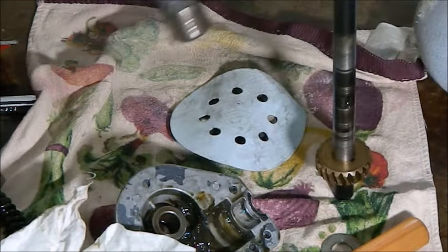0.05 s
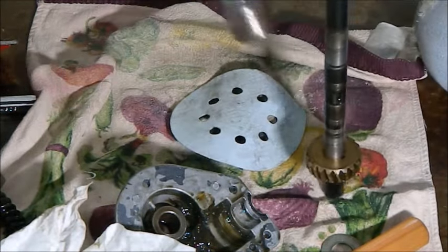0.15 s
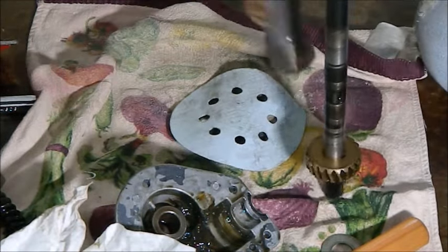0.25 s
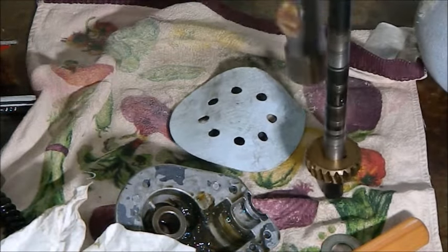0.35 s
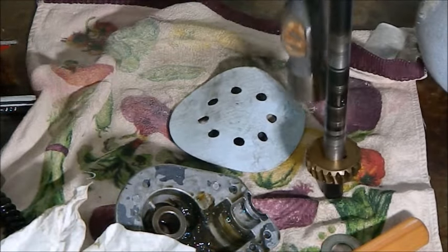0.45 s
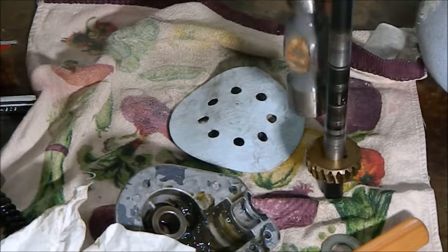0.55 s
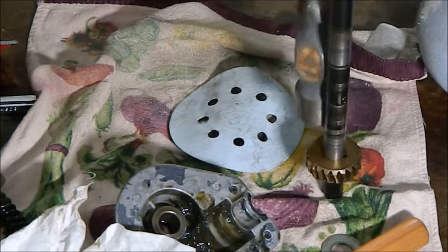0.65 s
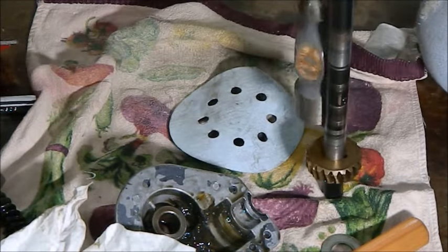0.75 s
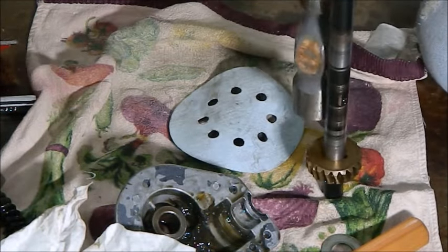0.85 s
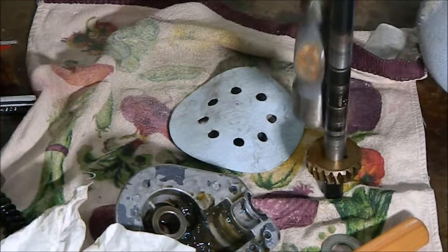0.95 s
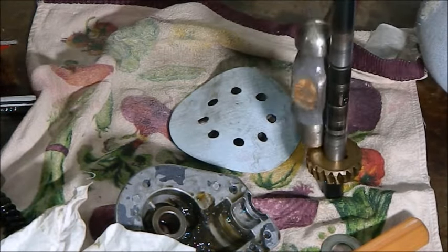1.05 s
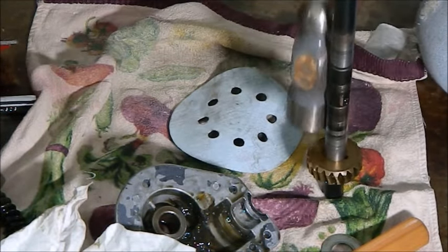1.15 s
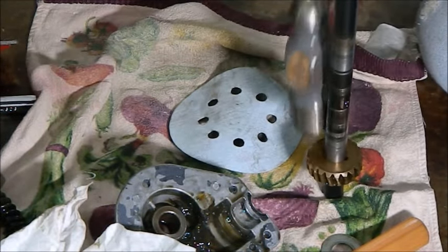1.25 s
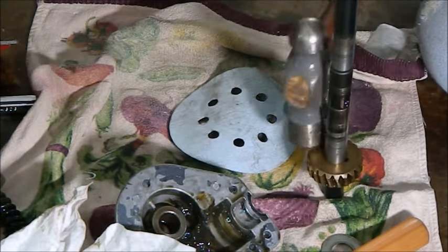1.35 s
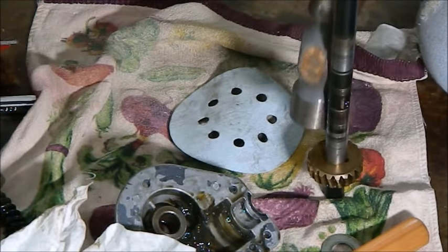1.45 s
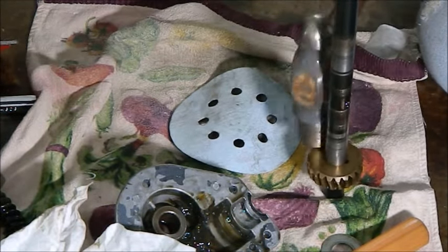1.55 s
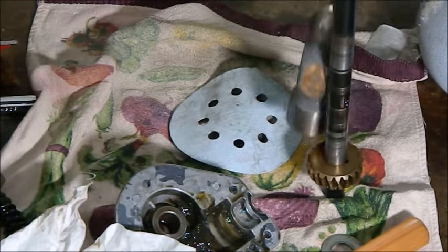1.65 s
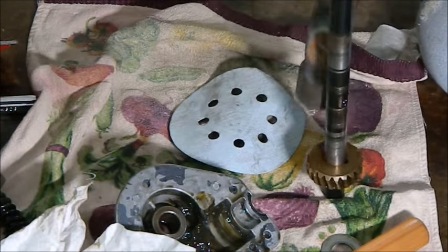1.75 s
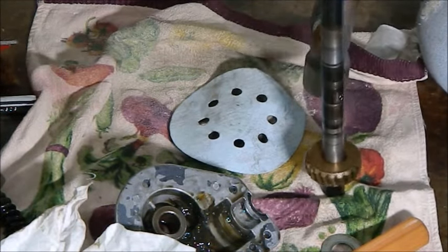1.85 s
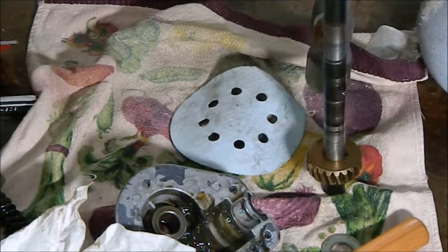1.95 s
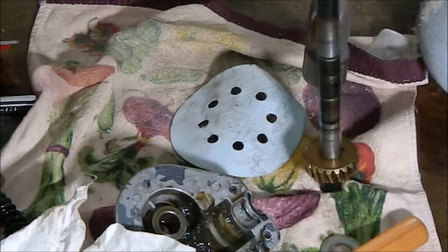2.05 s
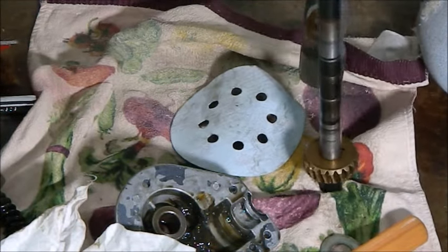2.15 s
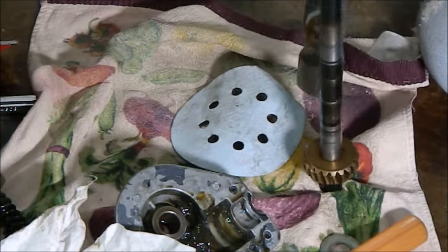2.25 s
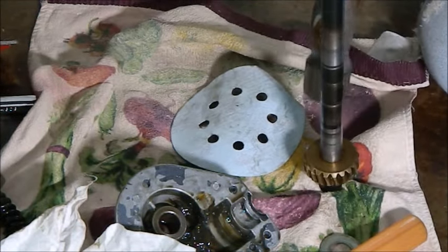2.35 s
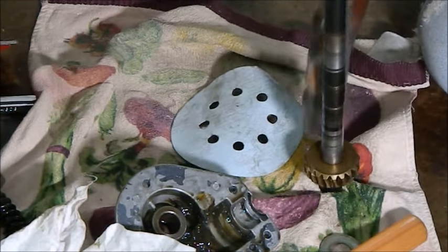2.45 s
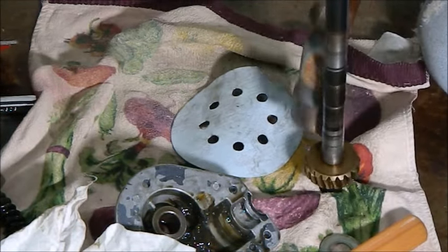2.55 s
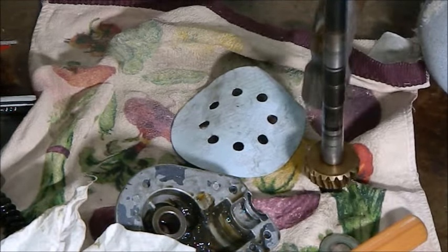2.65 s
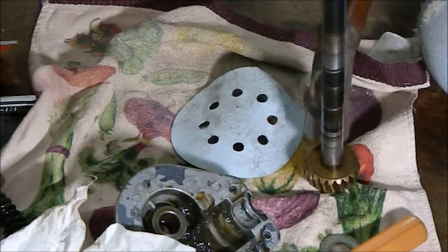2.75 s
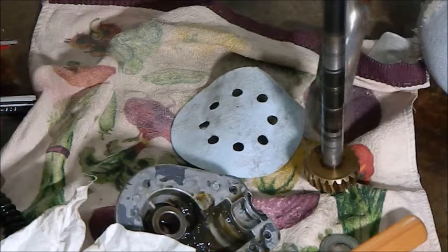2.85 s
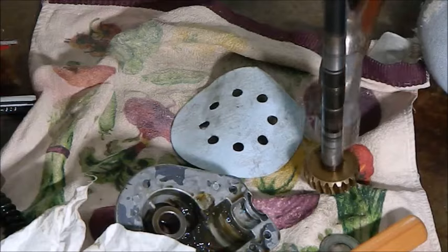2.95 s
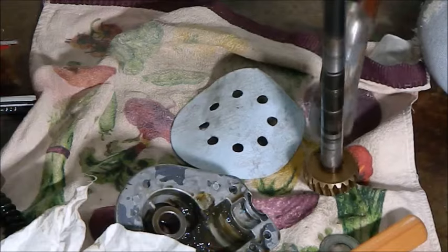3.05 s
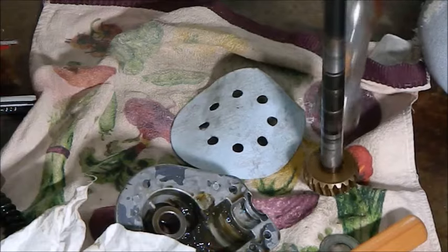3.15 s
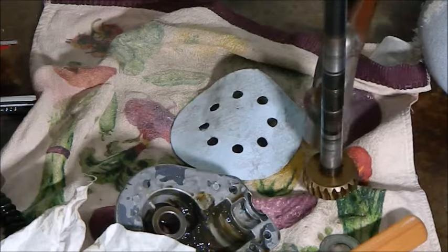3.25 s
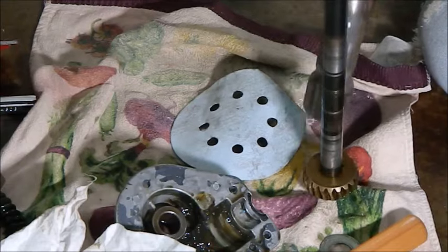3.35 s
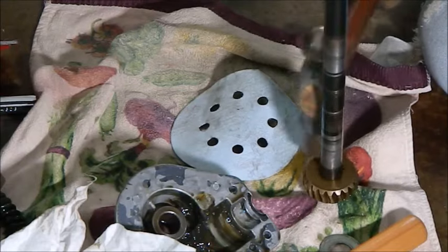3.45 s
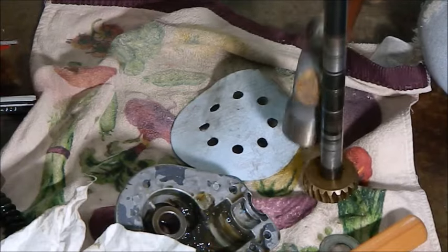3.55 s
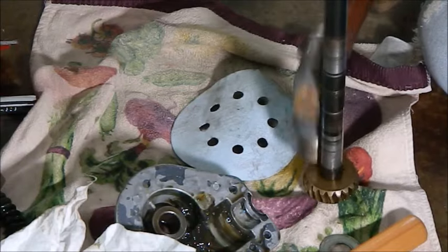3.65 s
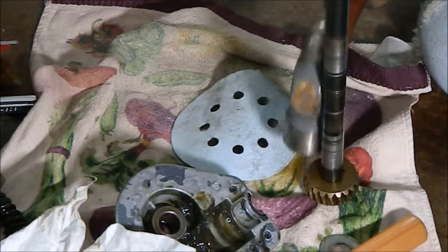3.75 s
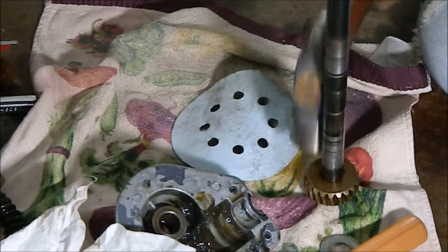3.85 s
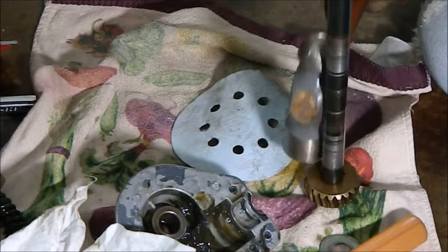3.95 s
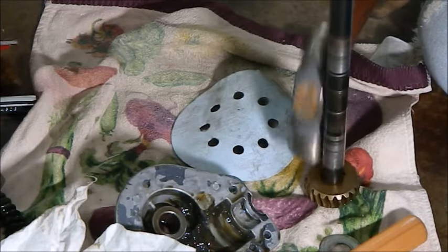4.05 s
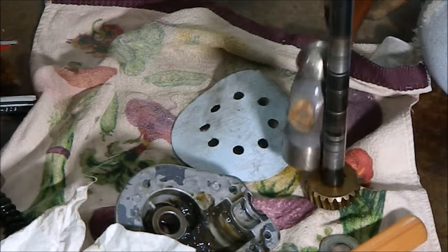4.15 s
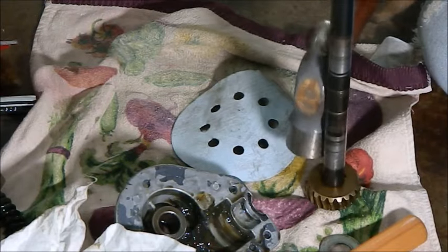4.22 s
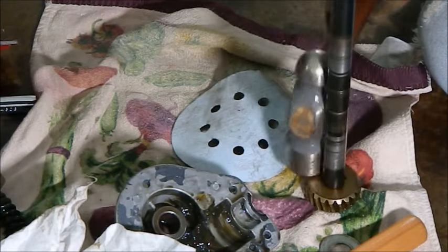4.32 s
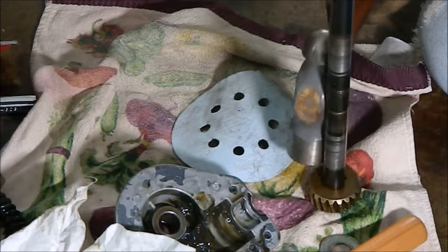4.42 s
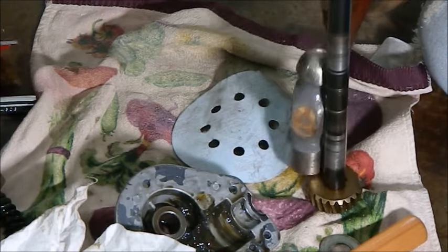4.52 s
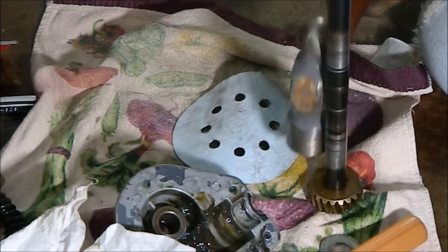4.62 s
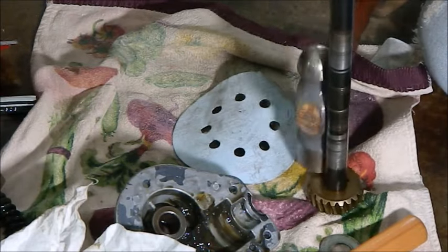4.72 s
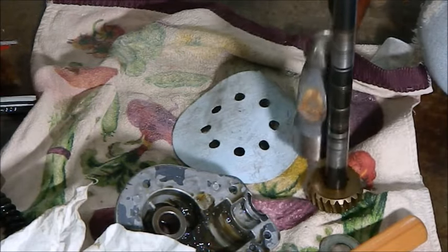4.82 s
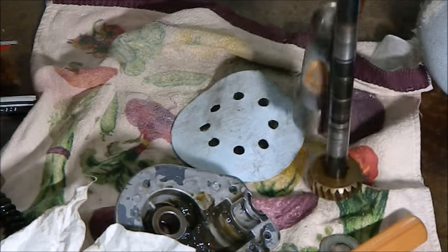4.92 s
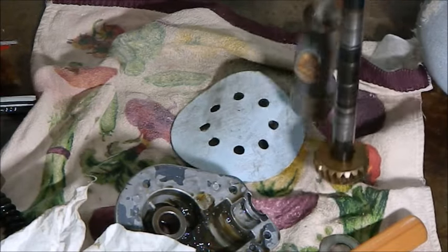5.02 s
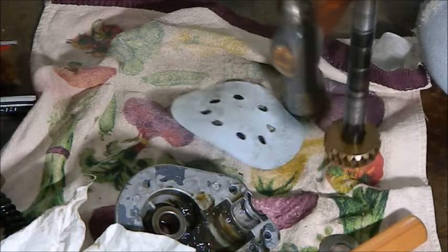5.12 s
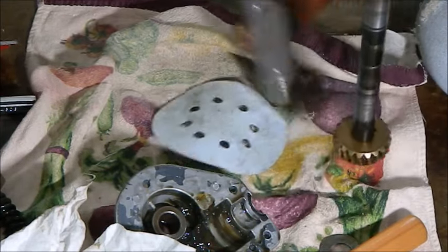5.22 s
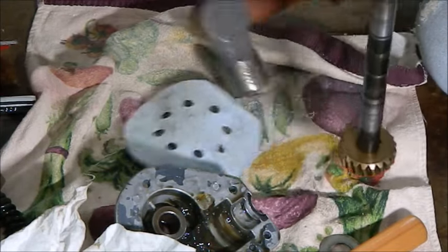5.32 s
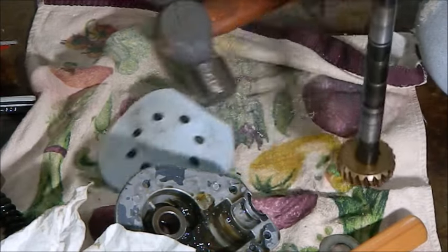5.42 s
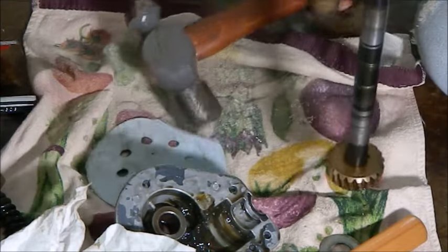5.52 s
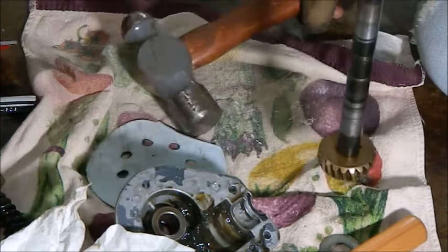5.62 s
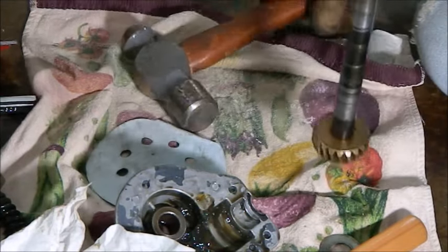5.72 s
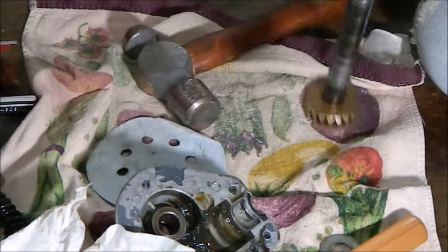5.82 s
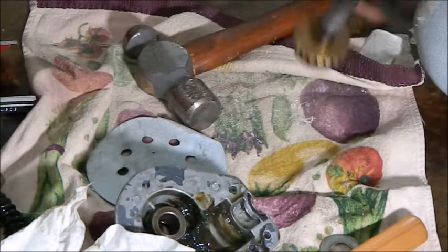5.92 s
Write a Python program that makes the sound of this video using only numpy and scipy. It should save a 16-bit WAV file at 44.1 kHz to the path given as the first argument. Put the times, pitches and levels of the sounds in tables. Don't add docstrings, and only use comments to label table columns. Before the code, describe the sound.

A small hammer taps an upright steel shaft in uneven quick blows, bright short rings over dull bench thuds, then is laid down with a clink.

```python
import sys
import numpy as np
from scipy import signal
from scipy.fft import rfft, irfft
from scipy.io import wavfile
from scipy.ndimage import uniform_filter1d

SR = 44100
rng = np.random.default_rng(int(sys.argv[2]) if len(sys.argv) > 2 else 0)


def master(y):
    cut = np.clip(np.atleast_2d(y).T, -1, 1)
    pcm = np.round(cut * 32767)
    wavfile.write(sys.argv[1], SR, pcm.astype(np.int16))


def attenuation_scalar(level_db):
    decades = np.asarray(level_db, float) / 20
    return 10 ** decades


N = 263629
HZ = np.fft.rfftfreq(N, 1 / SR)


def read(table, hz):
    table_hz, value = np.transpose(table)
    return np.interp(np.log(hz + 1), np.log(table_hz), value)


def colour(x, spectrum):
    log_gain = np.log(attenuation_scalar(read(spectrum, HZ)))
    cepstrum = irfft(log_gain, N)
    cepstrum[1:N // 2] *= 2
    cepstrum[N // 2:] = 0
    rms_gain = np.sqrt(np.mean(np.exp(2 * log_gain)))
    return irfft(rfft(x) * np.exp(rfft(cepstrum)) / rms_gain, N)


def add(track, start_s, sound):
    i = int(start_s * SR)
    track[i:i + len(sound)] += sound[:N - i]


def ring(modes, scatter_db=0.0, detune=0.00338, rough=0.56, rise_s=0.00035):
    t = np.arange(SR // 2) / SR
    hz, db, t60_s = np.transpose(modes)[:, :, None]
    size, tune = rng.standard_normal((2, len(hz), 1))
    shake = rng.standard_normal((2, len(hz), len(t) // 150 + 1))
    shake = uniform_filter1d(np.repeat(shake, 150, axis=2), size=150)[..., :len(t)]
    waver = 1 + rough * (shake[0] + 1j * shake[1])
    waves = waver * np.exp(2j * np.pi * hz * (1 + detune * tune) * t)
    decay = attenuation_scalar(db + scatter_db * size - 60 * t / t60_s)
    onset = np.sin(np.pi / 2 * np.minimum(t / rise_s, 1)) ** 2
    return np.sum(decay * waves.imag, axis=0) * onset


def burst(t60_s, spiky_db=0.):
    t = np.arange(SR // 8) / SR
    noise = rng.standard_normal(len(t))
    return noise * attenuation_scalar(spiky_db * rng.standard_normal(len(t)) - 60 * t / t60_s)


# freq_hz, likeness_0_to_1
ALIKE = [(60, .7), (300, 0.76), (1000, 0.74), (4000, 0.29), (10000, 0.34)]


def pair(make):
    alike = np.clip(read(ALIKE, HZ), 0, 1)
    mid = rfft(make(), N) * np.sqrt((1 + alike) / 2)
    side = rfft(make(), N) * np.sqrt((1 - alike) / 2)
    return np.array([mid + side, mid - side])


# freq_hz, density_db
TONE_SPECTRUM = [(12, -31), (20, -47), (65, -1), (164, -5), (323, -16.5), (371, -3), (465, -6.5),
                 (599, -4.5), (709, -10.5), (1180, -15), (1790, -19.5), (2370, -17.5), (2730, -22),
                 (15100, -28.5), (16500, -28)]


def room_tone():
    swell = np.repeat(rng.standard_normal(N // 3000 + 1), 3000)[:N]
    swell = uniform_filter1d(swell, size=3000)
    tone = irfft(pair(lambda: colour(rng.standard_normal(N), TONE_SPECTRUM)), N)
    return attenuation_scalar(-60.5 + 1.7 * swell) * tone


# freq_hz, t60_s
ROOM_T60 = [(100, 0.5), (500, 0.4), (2000, 0.41), (6000, 0.3859), (14000, 0.15)]


def echoes():
    t = np.arange(SR // 2) / SR
    out = 0
    for hz in 62.5 * 2. ** np.arange(8):
        edges_hz = [hz / np.sqrt(2), hz * (np.sqrt(2) if hz < 8000 else 2.5)]
        octave = signal.butter(2, edges_hz, "bandpass", fs=SR, output="sos")
        band = signal.sosfilt(octave, rng.standard_normal(len(t)))
        t60_s = read(ROOM_T60, hz)
        out = out + band * attenuation_scalar(-60 * t / t60_s) / np.sqrt(t60_s * SR / np.log(1e6))
    return out * np.clip(t / 0.0038, 0, 1)


# freq_hz, difference_db
BALANCE = [(60, 12), (110, 3.5), (200, 1.5), (380, 2.5), (700, 2), (1290, 0.5), (2380, -3.5), (4400, -8.5),
           (8120, -2), (15000, 5.5)]
# freq_hz, lead_rad
LEAD = [(300, 0.46), (1700, -0.33), (3200, -0.095), (4700, .2), (7300, 1.7), (11000, 1.6), (14000, 0.13)]


def in_room(close):
    lean = attenuation_scalar(read(BALANCE, HZ) / 2) * np.exp(.5j * read(LEAD, HZ))
    direct_gain, echo_gain = attenuation_scalar(-3.5), attenuation_scalar(-4.5)
    heard = np.array([lean, 1 / lean]) * (direct_gain + echo_gain * pair(echoes))
    ears = []
    for response in heard:
        impulse = np.roll(irfft(response, N), 512)[:SR // 2]
        ears.append(signal.fftconvolve(close, impulse)[512:N + 512])
    return np.array(ears)


def slip(moves, spectrum, grain_db):
    t = np.arange(N) / SR
    gain = 0
    for peak_s, db, swell_s, fade_s in moves:
        shape = np.minimum(1 + (t - peak_s) / swell_s, 1 - (t - peak_s) / fade_s)
        gain = gain + attenuation_scalar(db) * np.clip(shape, 0, 1)
    grain = uniform_filter1d(rng.standard_normal(N), size=100) * 10
    grains = rng.standard_normal(N) * attenuation_scalar(grain_db * grain)
    return gain * colour(grains / np.std(grains), spectrum)


# peak_s, level_db, swell_s, fade_s
RUSTLES = [
    (.125, -59.5, 0.019, 0.12),
    (.53, -61.5, 0.028, 0.05),
    (.636, -63, 0.038, .04),
    (1.98, -60, .2, 0.13),
    (2.205, -80, .01, 0.031),
    (2.346, -57, .02, 0.055),
]
# freq_hz, density_db
RUSTLE_SPECTRUM = [(700, -10.5), (1200, 1), (2200, 4), (3500, -7), (6000, -16)]


def cloth_rustle():
    return slip(RUSTLES, RUSTLE_SPECTRUM, grain_db=2.3)


# peak_s, level_db, swell_s, fade_s
DRONES = [
    (1.82, -58.5, .03, 0.36),
    (2.1, -65, 0.028, 0.055),
    (2.22, -56, .06, 0.1),
    (2.46, -60, 0.085, 0.02),
]
# freq_hz, density_db
DRONE_SPECTRUM = [(59, -45), (100, -12), (135, -22), (187, -9.5), (272, -44.5), (371, -3), (458, -18),
                  (600, -4), (714, -32), (1000, -23), (1300, -66), (2200, -120)]


def far_drone():
    return slip(DRONES, DRONE_SPECTRUM, grain_db=0.89)


# peak_s, level_db, swell_s, fade_s
DRAGS = [
    (5.19, -44.5, 0.025, 0.11),
    (5.39, -47.5, 0.07, 0.028),
    (5.5, -63, .08, 0.33),
    (5.76, -57, 0.056, 0.068),
]
# freq_hz, density_db
DRAG_SPECTRUM = [(590, -18), (1000, -12.5), (2710, -5.5), (2910, -0.5), (3080, -8), (7780, -13),
                 (14700, -23.5), (15700, -37), (16500, -66.5)]


def cloth_drag():
    return slip(DRAGS, DRAG_SPECTRUM, grain_db=3.1)


# freq_hz, level_db, t60_s
BENCH = [(155, -7, .2), (368, 1.5, .3), (414, 3, .34), (480, -8, .2), (537, -1, .22), (573, -6, .2)]
# freq_hz, level_db, t60_s
BOARD = [(669, -4, .5), (720, -1, .2), (808, 0, .22), (896, -1, .2), (1012, -2, .22)]


def bench(tracks, start_s, boom_db, knock_db):
    add(tracks["tones"], start_s, attenuation_scalar(boom_db - 7.5) * ring(BENCH, rough=0.2, rise_s=0.0077))
    add(tracks["tones"], start_s, attenuation_scalar(knock_db - 11.0) * ring(BOARD, rough=0.41, rise_s=0.0026))
    add(tracks["boom"], start_s, attenuation_scalar(boom_db + 5.5) * burst(.08))
    add(tracks["knock"], start_s, attenuation_scalar(knock_db + 4.0) * burst(0.051))


# start_s, push_db, boom_db, knock_db, edge_db
THUDS = [
    (5.617, -26.5, -30, -31, -50),
    (5.761, -26, -29.5, -28, -32),
    (5.898, -34, -35, -33, -45),
]
# start_s, level_db
FLICKS = [
    (5.751, -56),
    (5.76, -55),
]
# start_s, level_db
CLINKS = [
    (5.8998, -19),
    (5.907, -29),
    (5.921, -31),
    (5.936, -35),
    (5.971, -27),
]
# freq_hz, level_db, t60_s
PARTS = [(2190, -3, .25), (2600, -6, .15), (3000, -5, .15), (3650, 0, .22), (4400, -14, .1),
         (5250, -5, .18), (6800, -15, .12), (8600, -22, .1)]


def lay_down(tracks):
    for start_s, push_db, boom_db, knock_db, edge_db in THUDS:
        add(tracks["push"], start_s, attenuation_scalar(push_db + 3.0) * burst(.03))
        add(tracks["edge"], start_s, attenuation_scalar(edge_db) * burst(.05))
        bench(tracks, start_s, boom_db - 4.5, knock_db - 1.5)
    for start_s, db in FLICKS:
        add(tracks["flick"], start_s, attenuation_scalar(db) * burst(.05))
    for start_s, db in CLINKS:
        add(tracks["tones"], start_s, attenuation_scalar(db - 12.5) * ring(PARTS, rough=1.1, detune=.02))
        add(tracks["clink"], start_s, attenuation_scalar(db + 11) * np.ones(1))
        add(tracks["clink"], start_s, attenuation_scalar(db + 8) * burst(.009))


# time_s, first_bend_hz, second_bend_hz
BENDS = [
    (.74, 2075, 3310),
    (1.15, 2070, 3340),
    (1.5, 2020, 3230),
    (2.45, 1995, 3345),
    (3.05, 1985, 3350),
    (3.3, 1970, 3190),
    (3.8, 1897, 3190),
    (4.44, 1815, 3150),
]
# multiple_of_bend, level_db, t60_s
FIRST_BEND = [(1, -3, 0.11), (1.04, -5.5, 0.072), (.96, -9.5, 0.076)]
SECOND_BEND = [(0.99, 1.5, 0.13), (0.75, -5, 0.084), (0.53, -4.5, 0.022)]
THIRD_BEND = [(0.999, 4.5, 0.13), (1.568, -4.5, 0.22)]


def shaft(start_s, first_db, second_db, third_db):
    times_s, first_bend_hz, second_bend_hz = np.transpose(BENDS)
    first_hz = np.interp(start_s, times_s, first_bend_hz)
    second_hz = np.interp(start_s, times_s, second_bend_hz)
    third_hz = 4800 + .45 * (first_hz - first_bend_hz[0])
    groups = [(FIRST_BEND, first_hz, first_db), (SECOND_BEND, second_hz, second_db),
              (THIRD_BEND, third_hz, third_db)]
    modes = []
    for group, bend_hz, bend_db in groups:
        modes += [(bend_hz * k, db + bend_db, t60_s) for k, db, t60_s in group]
    return ring(modes, rough=.55, scatter_db=2.0)


# freq_hz, level_db, t60_s
HEAD = [(7414, 5, .24), (8600, 0, .24), (6600, -8, .14), (9670, -13, .15), (10600, -11, .2),
        (11000, -8, .16), (11500, -12, .1), (12300, -17, .15), (13300, -14, .16), (15000, -20, .1)]


def hammer_head(rough, scatter_db):
    return ring(HEAD, rough=rough, scatter_db=scatter_db)


# start_s, first_bend_db, second_bend_db, third_bend_db, head_db
BRUSHES = [(0.7372, -24, -41, -57, -65), (0.9108, -43, -63, -74, -75), (1.0201, -56, -65, -75, -80),
           (1.1484, -33, -40.5, -48, -55), (1.3114, -52, -58, -62, -75), (1.492, -18.5, -33, -44, -40),
           (1.7, -27.5, -44, -53, -58), (2.4673, -29, -39, -58, -62), (2.533, -31, -39, -46, -60),
           (2.7417, -33, -44.5, -53, -58), (3.695, -33, -37, -47, -58), (3.8861, -31, -33, -36.5, -52),
           (4.0926, -37, -38, -44, -60), (4.2835, -38, -46, -52, -62), (4.4173, -28, -37, -37, -54),
           (4.7257, -33, -30.5, -39, -52)]


def brushes(tracks):
    for start_s, first_db, second_db, third_db, head_db in BRUSHES:
        tick_db = (first_db + second_db) / 2 - 3.5
        add(tracks["tones"], start_s, attenuation_scalar(head_db) * hammer_head(rough=.3, scatter_db=2.5))
        add(tracks["crack"], start_s, attenuation_scalar(head_db + 11) * burst(.03, spiky_db=2.5))
        add(tracks["tones"], start_s, attenuation_scalar(-0.5) * shaft(start_s, first_db, second_db + 2.0, third_db - .8))
        add(tracks["tick"], start_s, attenuation_scalar(tick_db + 5.5) * burst(.04, spiky_db=3))
        add(tracks["tick"], start_s, attenuation_scalar(tick_db + 17) * np.ones(1))
        add(tracks["knock"], start_s, attenuation_scalar(tick_db - 7) * burst(.05))
        add(tracks["push"], start_s, attenuation_scalar(-16.5 + .6 * tick_db) * burst(.05))


# start_s, crack_db, upper_bends_db, boom_db, knock_db
BLOWS = [(1.0834, -28.5, -43.5, -21.5, -36), (1.3633, -27, -39, -29.5, -25.5),
         (1.6018, -26, -37, -29.5, -22), (2.5516, -27.5, -28.5, -29.5, -29),
         (2.8086, -25.5, -29, -31, -33.5), (3.033, -26, -34, -29, -32), (3.2701, -22.5, -34, -26.5, -28.5),
         (3.5209, -26, -34, -31.5, -33.5), (3.7454, -26.5, -27.5, -30, -27.5), (3.9639, -26, -33, -36, -35),
         (4.1579, -23.5, -26.5, -30, -33.5), (4.35, -23.5, -27, -28.5, -29.5),
         (4.5438, -27, -34.5, -23.5, -23.5), (4.792, -28.5, -33, -28, -25)]


def blows(tracks):
    for start_s, crack_db, upper_db, boom_db, knock_db in BLOWS:
        glance_db = upper_db + 33.5
        first_db = -22.5 - 0.18 * glance_db
        head_db = crack_db - 12.5 + 1.8 * min(glance_db + 2.5, 0)
        add(tracks["tones"], start_s, shaft(start_s, first_db, upper_db, upper_db - 11.5))
        add(tracks["tones"], start_s, attenuation_scalar(head_db) * hammer_head(rough=0.22, scatter_db=1.6))
        add(tracks["snap"], start_s, attenuation_scalar(crack_db + 3.0) * burst(.008))
        add(tracks["crack"], start_s, attenuation_scalar(crack_db + 5.5) * burst(.07, spiky_db=2.5))
        bench(tracks, start_s + 0.0013, boom_db, knock_db)


# freq_hz, density_db
SNAP = [(1000, -12), (3000, 0), (8000, -4.5), (12000, -8), (15500, -14), (16500, -40)]
CRACK = [(530, -28), (900, 1), (1210, -14.5), (1960, -5), (2660, -7.5), (2860, -4), (4220, -8.5),
         (5300, -2.5), (7290, -4.5), (15300, -39.5), (16500, -56)]
TICK = [(300, -40), (800, -9), (1500, -8.5), (2050, -0.5), (2700, -7), (3300, -4), (4000, -14), (6000, -24),
        (9000, -45), (14000, -70)]
BOOM = [(60, -26), (150, -6), (240, -10.5), (330, -2), (420, 2), (540, 2.5), (680, -14), (1000, -25.5),
        (3000, -70)]
KNOCK = [(300, -30), (600, -1), (800, -0.5), (1100, -5), (1500, -9.5), (2200, -25), (5000, -70)]
PUSH = [(35, -40), (60, -10), (165, -2), (400, 3), (1220, -13), (1470, -10), (1750, -22), (2040, -22),
        (2500, -38), (3250, -64), (5500, -120)]
EDGE = [(500, -40), (1000, -8), (1400, -14), (2000, 0), (2400, -12), (3200, -35), (6000, -70)]
FLICK = [(2500, -25), (5000, -3), (9000, 0), (15000, -6)]
CLINK = [(500, -30), (1200, -9), (2200, 4), (3600, -1), (4400, -12), (5200, -4), (7000, -12), (11000, -21),
         (16000, -30)]


def hammer():
    spectra = dict(snap=SNAP, crack=CRACK, tick=TICK, boom=BOOM, knock=KNOCK, push=PUSH, edge=EDGE,
                   flick=FLICK, clink=CLINK)
    tracks = {name: np.zeros(N) for name in ["tones", *spectra]}
    blows(tracks)
    brushes(tracks)
    lay_down(tracks)
    return tracks["tones"] + sum(colour(tracks[name], spectrum) for name, spectrum in spectra.items())


def scene():
    close = hammer() + cloth_drag() + cloth_rustle() + far_drone()
    low_cut = signal.butter(2, 100, "highpass", fs=SR, output="sos")
    return in_room(signal.sosfilt(low_cut, close)) + room_tone()


def camera_rounding(x):
    hop, band, early = 960, 16, 600
    round_db, treble_db, octave_db, patchy_db = 9, 7.6, 5.5, 10
    x = np.pad(x, ((0, 0), (hop + early, 3 * hop - (N + early) % hop)))
    n, k = np.arange(2 * hop), np.arange(hop)
    window = np.sin(np.pi * (n + .5) / (2 * hop))
    basis = window * np.cos(np.pi / hop * np.outer(k + .5, n + .5 + hop / 2))
    lines = np.lib.stride_tricks.sliding_window_view(x, 2 * hop, axis=1)[:, ::hop] @ basis.T
    level = np.sqrt(np.mean(lines.reshape(*lines.shape[:2], -1, band) ** 2, axis=3))
    hz = (np.arange(hop // band) + .5) * band * SR / (2 * hop)
    step = level * attenuation_scalar(-round_db) * np.sqrt(12) * np.minimum(hz / 1200, 1) ** 1.5 + 1e-12
    middle = level[..., (hz > 1500) & (hz < 7500)].mean(axis=(0, 2))
    lasting = np.minimum(middle, np.roll(middle, 1))[:, None]
    patches = rng.standard_normal((len(lasting) // 3 + 1, len(hz)))
    patches = np.repeat(patches, 3, axis=0)[:len(lasting)]
    mask_db = patchy_db * patches - treble_db - octave_db * np.log2(hz / 7600)
    masked = (hz > 7600) * lasting * attenuation_scalar(mask_db)
    step = np.repeat(np.maximum(step, masked), band, axis=2)
    frames = np.round(lines / step) * step @ basis * 2 / hop
    out = frames[:, 1:, :hop] + frames[:, :-1, hop:]
    return out.reshape(2, -1)[:, early:early + N]


def low_pass(x):
    return signal.sosfilt(signal.butter(12, 15600, fs=SR, output="sos"), x)


def record(dry):
    mix = camera_rounding(dry)
    return low_pass(mix)


dry = scene()
out = record(dry)
master(out)
```